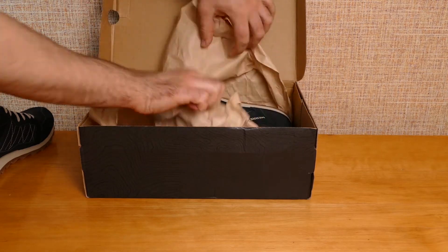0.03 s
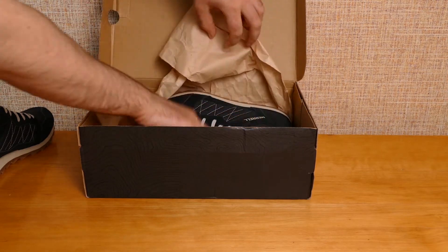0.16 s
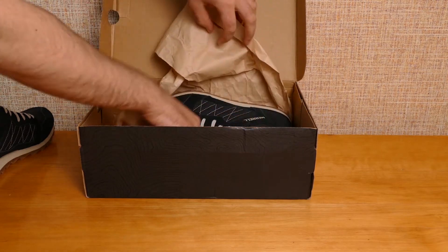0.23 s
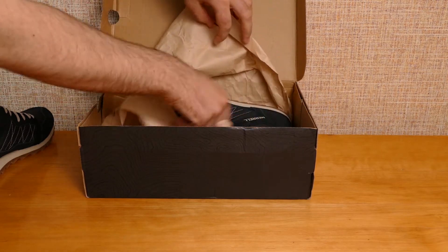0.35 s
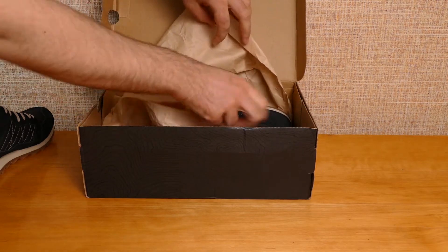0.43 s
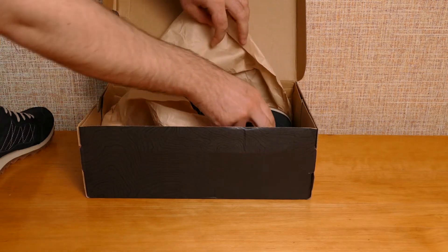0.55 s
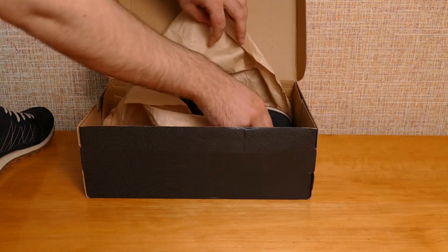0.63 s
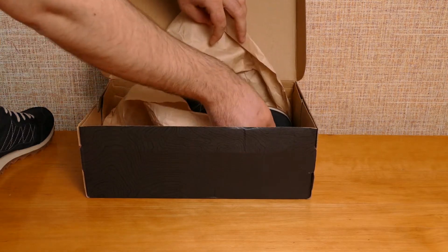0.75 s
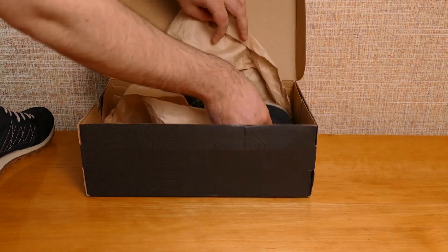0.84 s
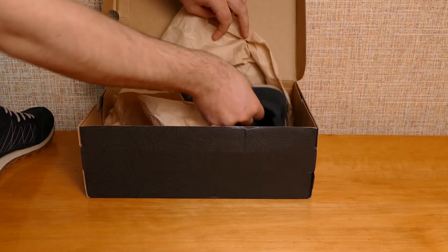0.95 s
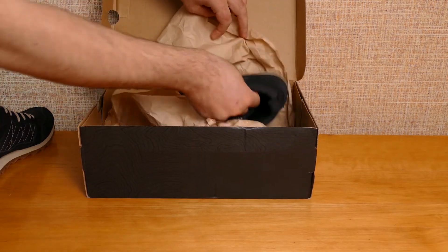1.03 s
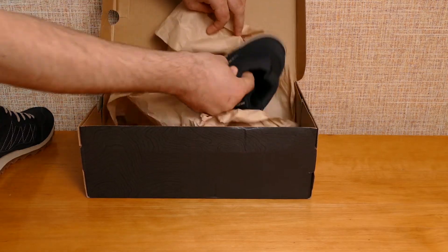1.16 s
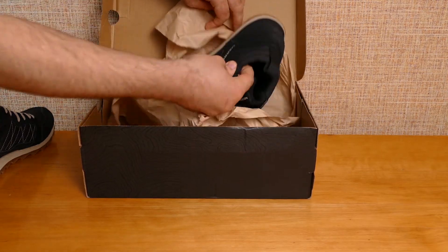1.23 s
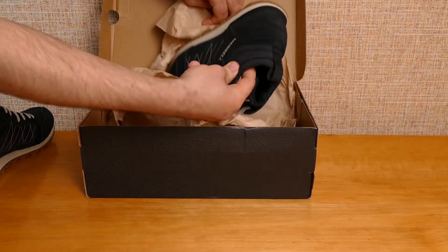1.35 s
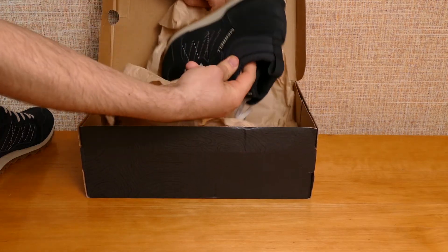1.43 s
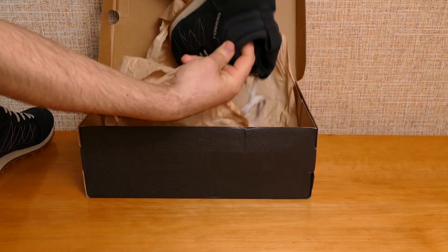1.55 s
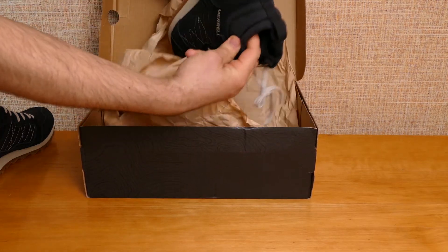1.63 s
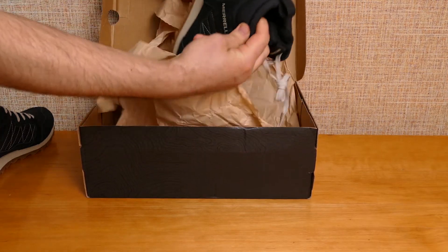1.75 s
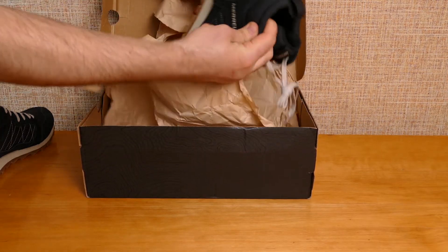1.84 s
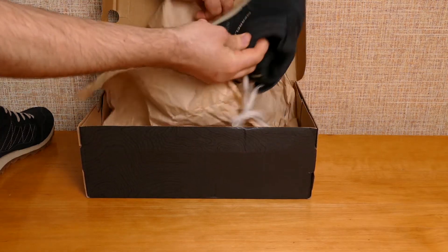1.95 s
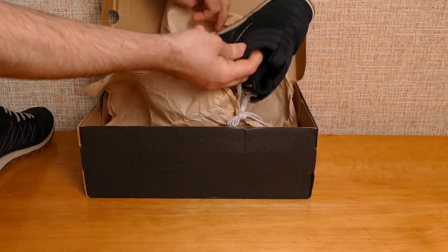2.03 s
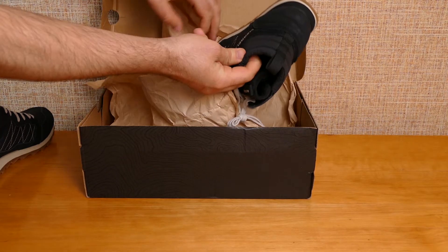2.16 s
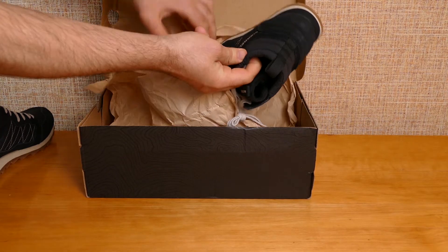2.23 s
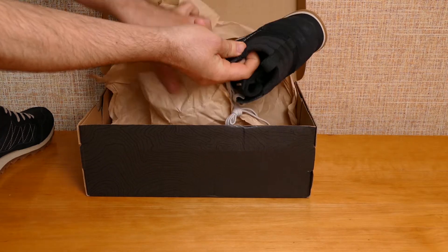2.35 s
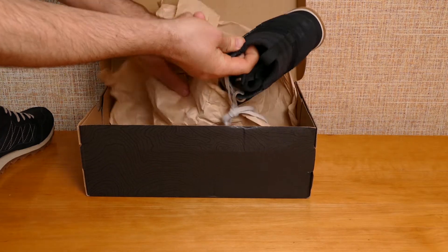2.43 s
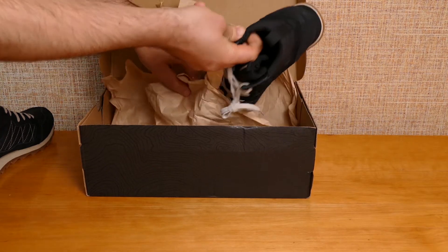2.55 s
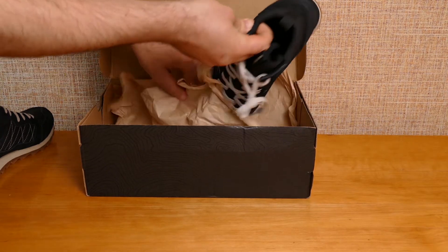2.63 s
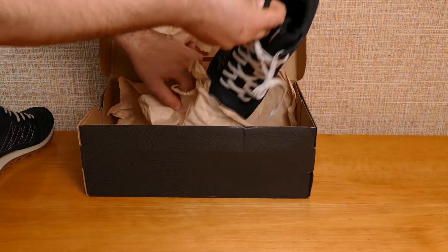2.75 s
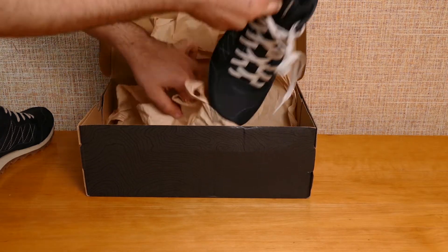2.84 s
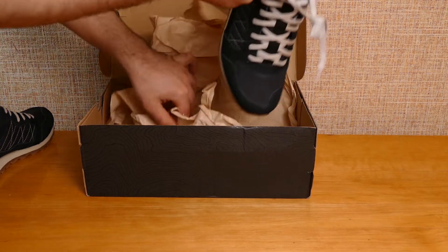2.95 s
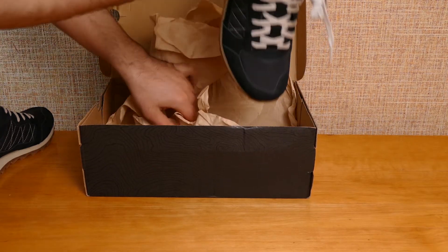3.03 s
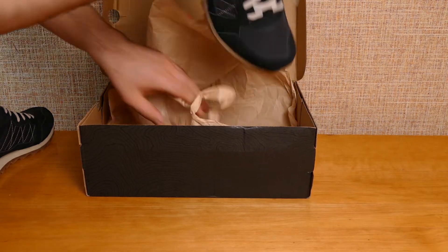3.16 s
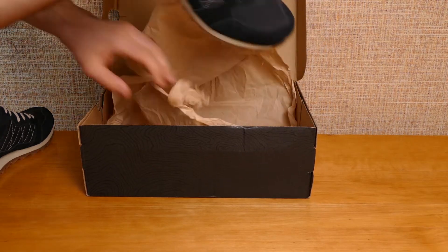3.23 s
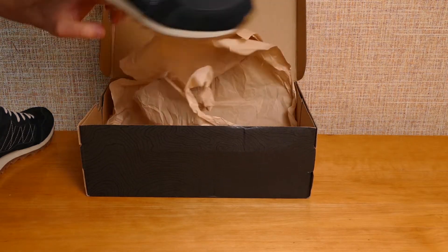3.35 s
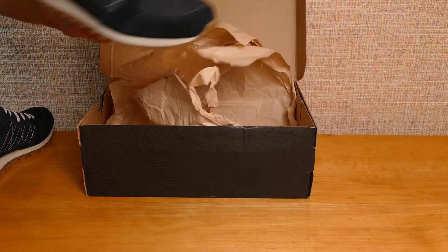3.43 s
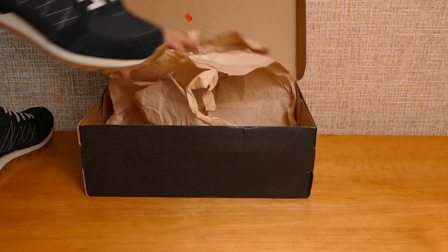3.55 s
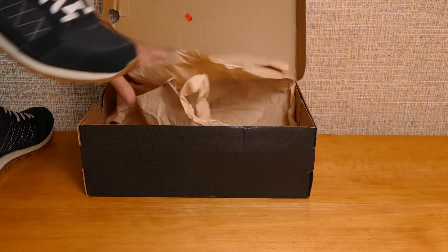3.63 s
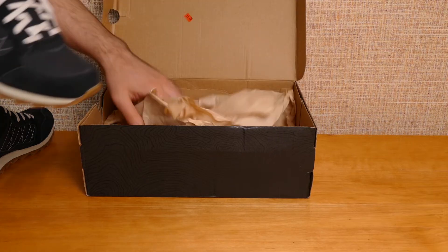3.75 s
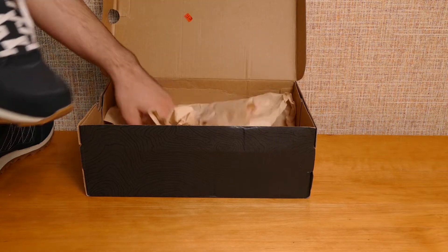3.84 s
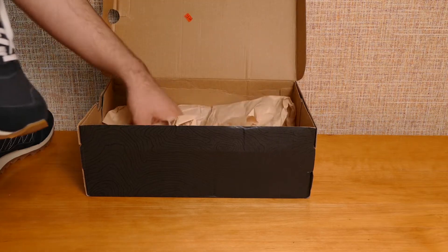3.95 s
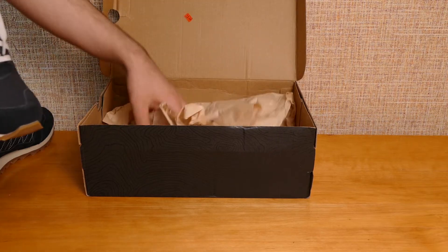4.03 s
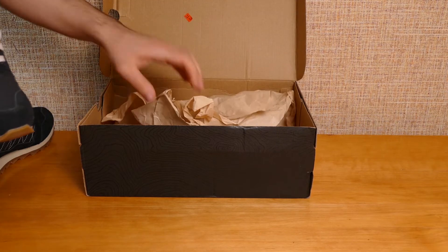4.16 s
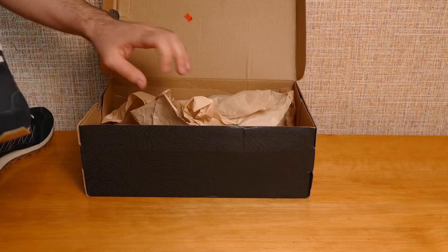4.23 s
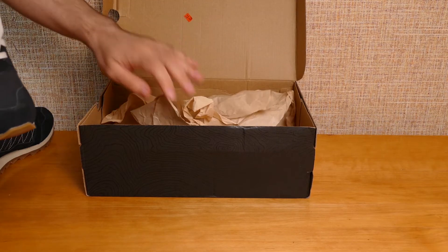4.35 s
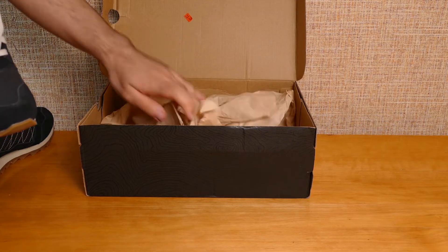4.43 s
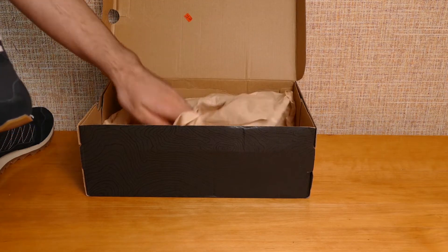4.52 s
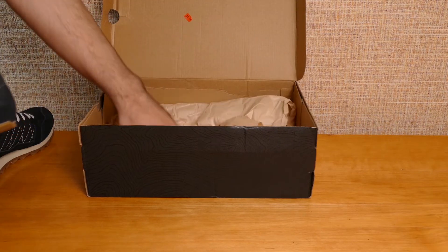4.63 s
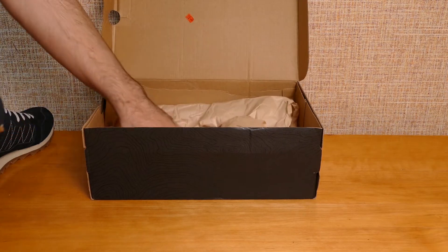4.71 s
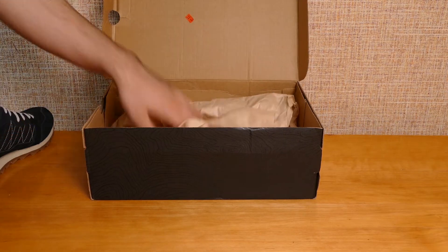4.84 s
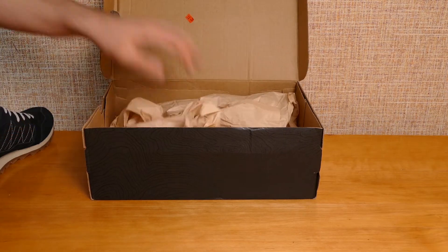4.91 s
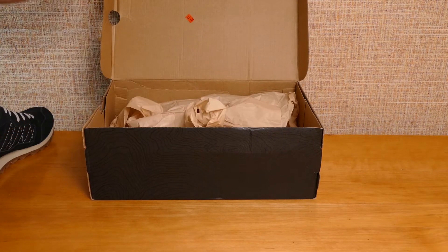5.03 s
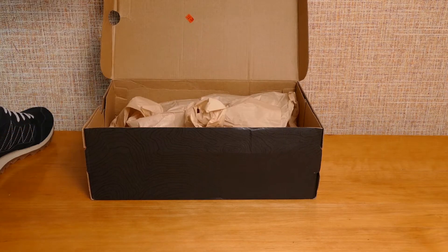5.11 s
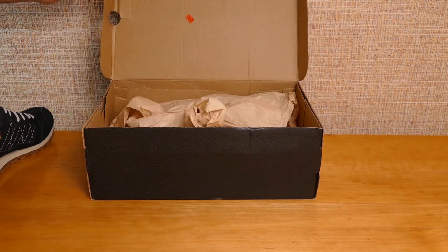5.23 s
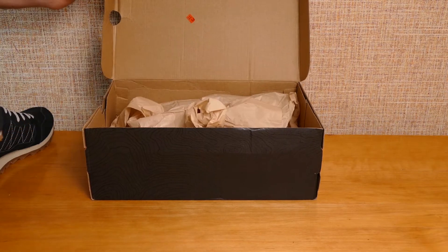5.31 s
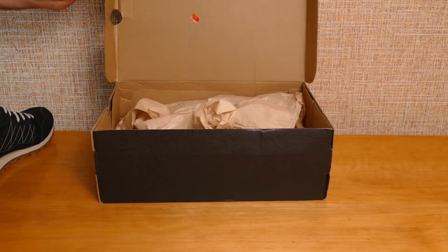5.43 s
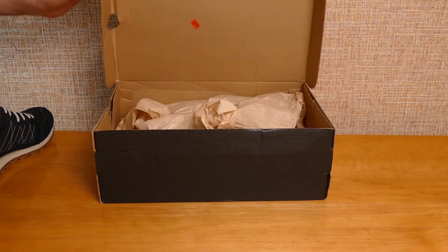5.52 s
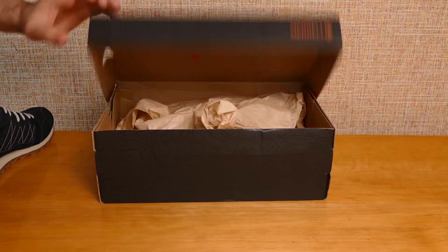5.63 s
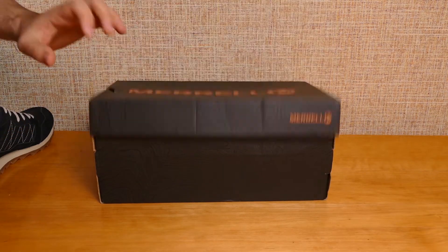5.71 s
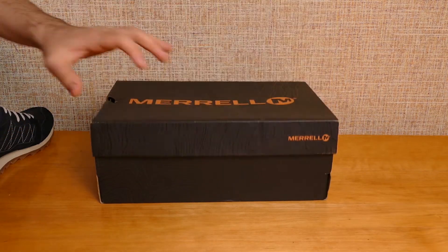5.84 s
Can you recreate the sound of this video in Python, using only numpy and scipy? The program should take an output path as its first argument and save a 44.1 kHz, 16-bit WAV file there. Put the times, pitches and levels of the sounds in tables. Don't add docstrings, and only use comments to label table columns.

```python
import sys
import numpy as np
from scipy import signal
from scipy.fft import rfft, irfft
from scipy.io import wavfile
from scipy.ndimage import uniform_filter1d

SR = 44100
rng = np.random.default_rng(int(sys.argv[2]) if len(sys.argv) > 2 else 0)


def wav_record(signal):
    frames = np.transpose(np.atleast_2d(signal))
    bounded = np.clip(frames, -1, 1)
    quanta = np.round(bounded * 32767).astype(np.int16)
    wavfile.write(sys.argv[1], SR, quanta)


def nominal_scale(level):
    x = np.asarray(level, float) / 20
    return 10 ** x


N = 259308


def unit(x):
    return x / np.sqrt(np.mean(x ** 2))


def read(table, hz):
    table_hz, value = np.transpose(table)
    return np.interp(np.log(hz), np.log(table_hz), value)


def band(x, lo_hz, hi_hz, order=2):
    return signal.sosfilt(signal.butter(order, [lo_hz, hi_hz], "band", fs=SR, output="sos"), x)


def coloured(x, table):
    hz = np.fft.rfftfreq(N, 1 / SR) + 1
    return irfft(rfft(x) * nominal_scale(read(table, hz)), N)


def walk(rate_hz):
    k = int(SR / rate_hz)
    levels = np.repeat(rng.standard_normal(N // k + 1), k)
    return uniform_filter1d(levels, k)[:N]


def snaps(per_s, spread_db):
    moment, rarity = rng.random((2, N))
    size = nominal_scale(-spread_db * np.log(1.002 - rarity)) * rng.choice([-1., 1.], N)
    return unit((moment < per_s / SR) * size)


def ring(modes, t):
    out = 0
    for hz, db, t60_s in modes:
        out = out + nominal_scale(db - 60 * t / t60_s) * np.sin(2 * np.pi * (hz * t + rng.random()))
    return out


def hands():
    # t/s, effort/dB, press/dB (how far the push goes down
    # into the box), bunch/dB (how tightly the wad is squeezed)
    sheet_lifted = [
        (0.0, -33.5, -7.5, -4),
        (0.05, -39.5, -11.5, -5),
        (0.234, -35, -8.5, -5.5),
        (0.286, -44, -6.5, -4),
        (0.344, -44.5, -20, -5),
        (0.486, -46, -17.5, -3.5),
        (0.584, -53.5, -18.5, -9.5),
        (0.676, -47.5, -19, -2.5),
        (0.76, -57.5, -14.5, -7),
    ]
    shoe_gripped = [
        (0.78, -50, -15, -7.5),
        (0.826, -43.5, -18, -7),
        (0.878, -41, -15, -7),
        (0.922, -44.5, -19.5, -3),
        (1.158, -40.5, -10.5, -4.5),
        (1.2, -38, -20, -6),
        (1.35, -44, -13, -3.5),
    ]
    shoe_raised = [
        (1.37, -45, -11.5, -3.5),
        (1.38, -40.5, -16.5, -3.5),
        (1.506, -44.5, -16, -5),
        (1.538, -41.5, -10, -3.5),
        (1.554, -39.5, -17.5, -3.5),
        (1.874, -53, -16.5, -4),
        (1.884, -50.5, -21, -7),
        (1.955, -55, -17.5, -7),
    ]
    wad_rummaged = [
        (1.98, -42, -18.5, -6.5),
        (2.024, -39.5, -19, -5.5),
        (2.246, -48, -17, -3.5),
        (2.264, -41, -24, -9),
        (2.346, -47, -18, 1),
        (2.392, -43.5, -17.5, -6),
        (2.524, -37.5, -15, -2),
        (2.69, -44, -17, -6.5),
        (2.72, -43, -17, -3),
    ]
    wad_let_go = [
        (2.74, -49, -12.5, -5.5),
        (2.762, -45.5, -1.5, 0),
        (2.816, -47.5, -11.5, -6.5),
        (2.824, -42, -15, -7.5),
        (2.938, -48, -17, -5.5),
        (3.272, -52.5, -17.5, -7.5),
        (3.342, -63, -15, -12),
        (3.51, -68.5, -12, -6),
        (3.54, -69.5, -10.5, -11),
    ]
    first_push = [
        (3.555, -58, -19, -17),
        (3.609, -47, -6, -4),
        (3.701, -43, -13, -7),
        (3.939, -38, -3, -5),
        (3.995, -48, -8, -4.5),
        (4.169, -46, -13.5, -7.5),
        (4.247, -61, -14.5, -9.5),
        (4.329, -85, -3, -10.5),
        (4.405, -99, -8.5, -11),
    ]
    second_push = [
        (4.42, -59, -15, -14.5),
        (4.464, -42.5, -13, -6),
        (4.532, -48, -10.5, -7),
        (4.6, -42.5, -15, -5.5),
        (4.652, -35.5, -5, -4),
        (4.778, -49.5, -12.5, -4.5),
        (4.914, -47, -17, -6.5),
        (5.126, -71, -9, -7.5),
        (5.19, -86, -12, -16),
    ]
    lid_reached = [
        (5.21, -83, -8, -4),
        (5.216, -72, -17, -7),
        (5.272, -63.5, -8.5, -7),
        (5.37, -77.5, -1, -9.5),
        (5.482, -76, -5.5, -8.5),
        (5.494, -69.5, -8, -5.5),
        (5.532, -89.5, -7, -10),
        (5.715, -86, -7, -6),
    ]
    lid_drops = [
        (5.74, -80, 1, -5.5),
        (5.745, -59.5, -3, -3.5),
        (5.757, -55.5, -8, -11),
        (5.763, -45.5, -9, -13),
        (5.776, -46.5, -3.5, -0.5),
        (5.81, -46, 0, 0),
        (5.84, -48.5, -0.5, -2.5),
        (5.88, -52, -4, -5),
    ]
    moves = np.concatenate([sheet_lifted, shoe_gripped, shoe_raised, wad_rummaged, wad_let_go,
                            first_push, second_push, lid_reached, lid_drops])
    t = np.arange(N) / SR
    s, effort_db, press_db, bunch_db = moves.T
    effort_db = np.interp(t, s, effort_db)
    press_db = np.interp(t, s, press_db + 14)
    bunch_db = np.interp(t, s, bunch_db + 5)
    slack_db = np.clip(effort_db + 46, -18, 0)
    crisp_db = 0.56 * slack_db - 0.45 * bunch_db
    body_db = 0.08 * slack_db + 0.03 * press_db + 1.14 * bunch_db
    flap_db = press_db
    push_db = -66 + 0.87 * (effort_db + 47) + 0.97 * press_db
    return effort_db, crisp_db, body_db, flap_db, push_db


def rustle(effort_db, crisp_db, body_db, flap_db):
    # f/Hz, level/dB per Hz
    paper_spectrum = [(500, -14), (700, -12.5), (1100, -9), (1500, -3), (2000, -2), (2700, -4), (3900, -3),
                      (5500, -5), (7500, -10.5), (9700, -6), (11700, -12), (13500, -14.5), (15500, -21)]
    out, grip = 0, walk(30)
    triggers = np.abs(snaps(per_s=120, spread_db=3.5))
    clusters = signal.lfilter([1], [1, -np.exp(-1 / (0.0063 * SR))], triggers)
    wide = unit(snaps(per_s=4000, spread_db=0.5) * (0.5 + 0.93 * unit(clusters)))
    crisp_db = np.minimum(crisp_db - np.median(crisp_db), 7)
    body_db = np.minimum(body_db - np.median(body_db), 9)
    flap_db = flap_db - np.median(flap_db)
    for hz in 500 * 2 ** np.arange(0, 5.1, 1 / 3):
        small = snaps(per_s=3000, spread_db=2.0)
        patch = unit(band(0.57 * wide + 0.99 * small, hz / 1.141, hz * 1.0973, order=3))
        if hz < 1200:
            colour_db = flap_db
        elif hz < 2700:
            colour_db = body_db
        else:
            colour_db = crisp_db * (hz > 5500)
        if 1200 < hz < 1400:
            colour_db = colour_db + 0.36 * flap_db
        if hz > 12000:
            colour_db = 1.3 * colour_db + 0.1 * (effort_db + 46) + 2.9 * walk(11)
        third_octave_db = read(paper_spectrum, hz) + 10 * np.log10(hz / 1000)
        out = out + patch * nominal_scale(third_octave_db + 0.54 * grip + 1.23 * walk(12) + colour_db)
    return out * nominal_scale(effort_db - 10.0)


def folds():
    # t/s, peak level/dB, shower of small creases/dB
    big_folds = [(0.1144, -32, -16), (0.2134, -19.5, -5), (0.5583, -39, -2.5), (0.634, -34.5, 2),
                 (0.7951, -33, -4), (0.8336, -27.5, -10), (0.879, -31.5, -5.5), (0.9265, -46, -8),
                 (0.992, -22, -10), (1.0713, -26.5, -3.5), (1.1035, -20.5, -10), (1.1942, -27, -5),
                 (1.3788, -25, -4), (1.541, -22, -4), (1.588, -27.5, 2.5), (1.8348, -34, -3),
                 (1.878, -39.5, 6), (1.983, -27, -4), (2.0462, -32, -20), (2.182, -20.5, -10.5),
                 (2.26, -33, -4), (2.3158, -37, -2.5), (2.46, -26.5, -7.5), (2.622, -28.5, -7),
                 (2.8235, -29.5, -5.5), (3.5957, -31.5, -1), (3.804, -38, 4), (4.018, -28, -10),
                 (4.455, -34.5, -7.5), (4.647, -27, -9)]
    # t/s, peak level/dB, thinness/dB
    settling = [(1.7957, -40, -6), (2.75, -42, -6), (3.0517, -33, 1), (3.2343, -41, -4), (3.444, -45.5, -2),
                (3.5486, -43.5, -5), (4.4152, -47, 5), (4.877, -39, -3), (4.925, -35.5, 4),
                (5.0683, -51, -5), (5.1282, -50.5, 3.5), (5.2124, -59, 6), (5.255, -53.5, 6),
                (5.285, -58, 6), (5.4844, -59, 7), (5.7414, -45, 11), (5.761, -31, 8.5), (5.768, -36, 8),
                (5.801, -37.5, -6)]
    settling_shower_db, shower_t60_s, tick_t60_s = -2, 0.15, 0.0063
    rows = [(s, peak_db, shower_db, 0) for s, peak_db, shower_db in big_folds]
    rows += [(s, peak_db, settling_shower_db, thin_db) for s, peak_db, thin_db in settling]
    out, t = np.zeros(N + SR), np.arange(SR // 4) / SR
    for s, peak_db, shower_db, thin_db in rows:
        bright_db = -12 + 0.084 * (peak_db + 27) + thin_db
        fade = nominal_scale(-60 * t / tick_t60_s) + nominal_scale(shower_db - 60 * t / shower_t60_s)
        burst = rng.standard_normal(len(t)) * fade
        crack = band(burst, 1500, 6300)
        crack = crack + nominal_scale(bright_db + 8.0) * band(burst, 7300, 11500)
        crack = crack + nominal_scale(-9.5 + 1.5 * thin_db) * band(burst, 12000, 16000)
        start = int(s * SR)
        out[start:start + len(t)] += crack * nominal_scale(peak_db - 6.0)
    return out[:N]


def box(push_db):
    # f/Hz, level/dB, t60/s
    table_modes = [(111.4, -10.5, 0.08), (137.8, -8, 0.27), (150, -5, .12)]
    wall_modes = [(194, -3, 0.14), (233, -2.5, 0.14), (280.2, -2, 0.15), (328.6, 4.5, 0.05)]
    rim_modes = [(397, 3.5, 0.11), (451.4, 3, 0.032), (522, -2.5, 0.052), (687, 1, 0.034), (980, -32, .1),
                 (1550, -6.5, 0.06)]
    # t/s, level/dB of the table top, of the box walls, of the rim
    knocks = [(0.009, -62, -53, -47.5), (1.44, -68.5, -71, -73), (2.156, -69, -65, -65),
              (3.73, -70, -57, -62.5), (5.728, -68, -69, -62), (5.49, -75, -78, -75.5),
              (5.759, -57.5, -53, -51), (0.049, -84.5, -49.5, -68), (0.239, -51.5, -60, -49),
              (0.85, -52, -54, -68), (0.99, -62, -68, -62), (0.915, -62, -73, -71), (1.069, -61, -52, -65),
              (1.17, -59.5, -47.5, -51), (1.294, -68, -53, -57), (1.548, -74, -80, -64),
              (2.576, -81.5, -59, -57), (2.754, -83, -50.5, -42), (2.79, -71, -54.5, -48),
              (3.598, -54.5, -57, -48), (3.868, -90, -47, -41.5), (4.468, -67.5, -51, -49),
              (4.681, -78.5, -54, -63), (4.916, -49.5, -58.5, -63), (5.074, -50.5, -61, -70.5),
              (5.269, -44, -51, -65), (5.283, -76, -50.5, -56), (5.772, -65, -47, -43),
              (5.813, -57, -45, -37)]
    # t/s, rim level/dB
    bounces = [
        (0.128, -64),
        (1.379, -51.5),
        (2.078, -61),
        (3.779, -45.5),
        (3.91, -51),
        (4.124, -58),
        (5.789, -47),
        (5.848, -41),
    ]
    contact_s, table_held_s, box_held_s = 0.00989, 0.13, 0.058
    t = np.arange(SR // 2) / SR
    jostle = signal.fftconvolve(snaps(per_s=900, spread_db=1.5), ring(wall_modes, t) + 1.8 * ring(rim_modes, t))
    scrape = band(snaps(per_s=1800, spread_db=3.5), 260, 560)
    stirred = unit(unit(jostle[:N]) + 0.45 * unit(scrape))
    walls = np.append(stirred * nominal_scale(push_db), np.zeros(SR))
    table_answer = ring(table_modes, t) * (1 - np.exp(-t / 0.0035))
    shaken = signal.fftconvolve(snaps(per_s=150, spread_db=1.0), table_answer)[:N]
    table = np.append(unit(shaken) * nominal_scale(push_db - 17.5), np.zeros(SR))
    swell = (1 - np.exp(-t / contact_s)) ** 2
    table_held = swell * np.exp(-(t / table_held_s) ** 3)
    box_held = swell * np.exp(-(t / box_held_s) ** 3)
    glancing = [(s, rim_db - 31.5, rim_db - 9.5, rim_db) for s, rim_db in bounces]
    for s, table_db, wall_db, rim_db in [*knocks, *glancing]:
        start = int((s - 0.907 * contact_s) * SR)
        table[start:start + len(t)] += table_held * nominal_scale(table_db + 10.5) * ring(table_modes, t)
        knock = nominal_scale(wall_db + 7.0) * ring(wall_modes, t) + nominal_scale(rim_db + 6.5) * ring(rim_modes, t)
        walls[start:start + len(t)] += box_held * knock
    thin = signal.butter(4, 176, "high", fs=SR, output="sos")
    return (table + signal.sosfilt(thin, walls))[:N]


def tail(x):
    t60_s, dull_hz = 0.21, 5050
    t = np.arange(SR // 2) / SR
    fade = nominal_scale(-60 * t / t60_s) * (t > 0.003)
    noise = rng.standard_normal((4, len(t)))
    dull = signal.sosfilt(signal.butter(2, dull_hz, fs=SR, output="sos"), noise)
    echoes = fade * (dull + (noise - dull) * nominal_scale(-30.0 * t / t60_s))
    place = np.pi * np.arange(N) / SR / 0.9
    shares = np.cos(place), np.sin(place), np.cos(0.37 * place), np.sin(0.39 * place)
    paths = (signal.fftconvolve(x * share, echo)[:N] for share, echo in zip(shares, echoes))
    return sum(paths) / np.sqrt(3.2 * np.sum(fade ** 2))


def room(paper, thuds):
    # f/Hz, side minus mid level/dB
    width = [(60, -7), (110, -32), (200, -14.5), (380, -15.5), (700, -7), (1290, -7.5), (2380, -7.5),
             (4400, -6.5), (8120, -5), (15000, 0)]
    tail_db = -7
    mid = (paper + nominal_scale(tail_db) * tail(paper)) / np.sqrt(1 + nominal_scale(2 * tail_db)) + thuds
    side = coloured(tail(paper + thuds), width)
    return np.array([mid + side, mid - side])


def hush():
    # f/Hz, level/dB per Hz
    hush_spectrum = [(60, -39), (100, -18), (140, -9.5), (185, -25), (390, -6.5), (545, -13.5),
                     (1250, -13.5), (2800, -14), (4100, -27), (8000, -29), (11900, -25), (12400, -47.5)]
    mid, side = (unit(coloured(rng.standard_normal(N), hush_spectrum)) * nominal_scale(-81) for _ in range(2))
    return mid + 0.63 * side * np.array([[1], [-1]])


def scene():
    effort_db, crisp_db, body_db, flap_db, push_db = hands()
    paper = rustle(effort_db, crisp_db, body_db, flap_db) + folds()
    return room(paper, box(push_db)) + hush()


def band_limit(x):
    return signal.sosfilt(signal.butter(12, 15740, fs=SR, output="sos"), x)


def record(dry):
    # f/Hz, width/Hz
    gaps = [(575, 49), (2670, 207)]
    x = signal.sosfilt(signal.butter(5, 105, "high", fs=SR, output="sos"), dry)
    rumble = rng.standard_normal(N) + 0.3 * rng.standard_normal(x.shape)
    x = x + nominal_scale(-73.5) * band(rumble, 30, 88)
    for hz, width_hz in gaps:
        x = signal.lfilter(*signal.iirnotch(hz, hz / width_hz, fs=SR), x)
    ringing_hz, ringing_width_hz = 2000, 4.7
    ring_on = signal.iirpeak(ringing_hz, ringing_hz / ringing_width_hz, fs=SR)
    x = x + nominal_scale(-13) * signal.lfilter(*ring_on, x)
    hz = np.fft.rfftfreq(N, 1 / SR)
    top_db = -11.0 / (1 + np.exp(-(hz - 12300) / 30))
    top_db = top_db - 5.0 * np.clip((hz - 13200) / 2000, 0, 2)
    top_db = top_db - 14.0 / (1 + np.exp(-(hz - 15350) / 80))
    mix = irfft(rfft(x) * nominal_scale(top_db) * (hz < 15700), N)
    return band_limit(mix)


dry = scene()
out = record(dry)
wav_record(out)
```